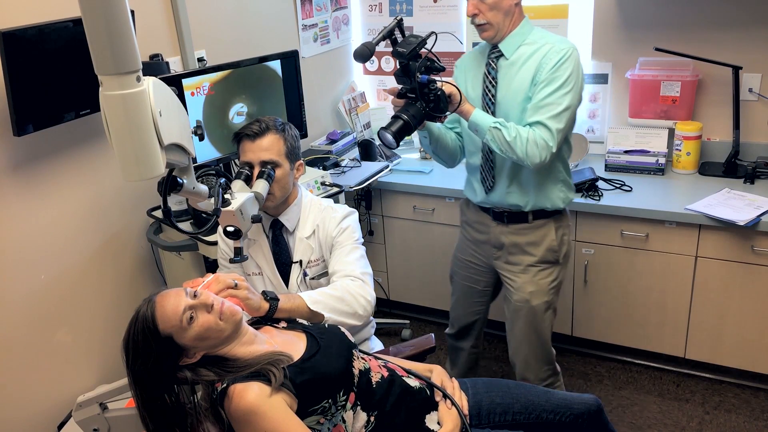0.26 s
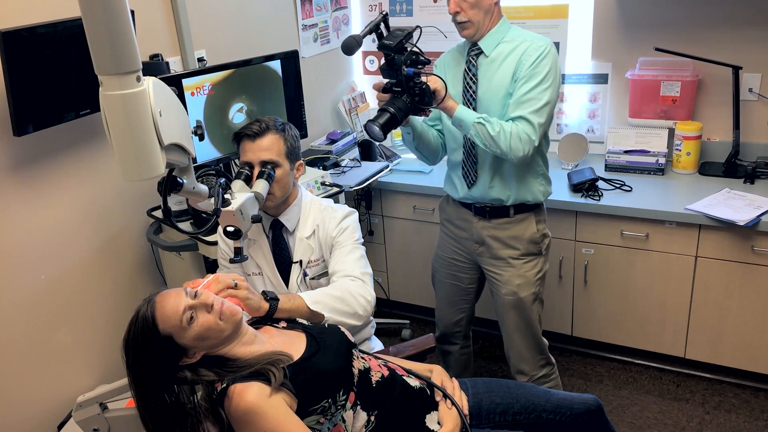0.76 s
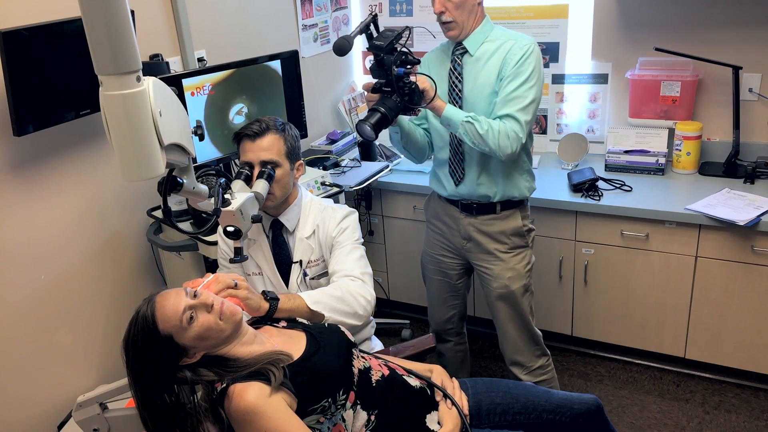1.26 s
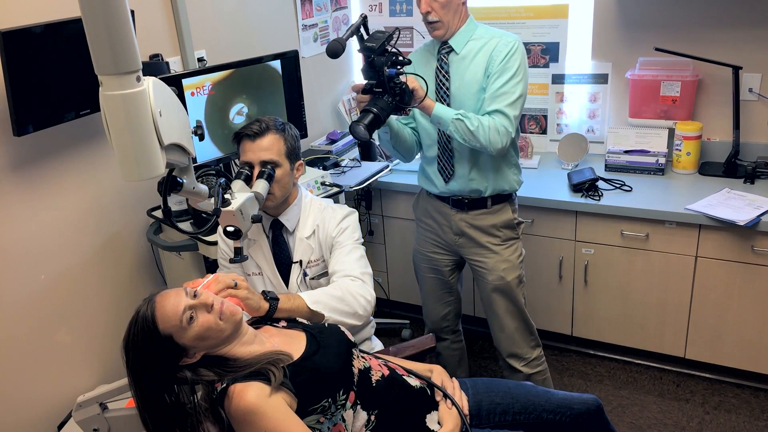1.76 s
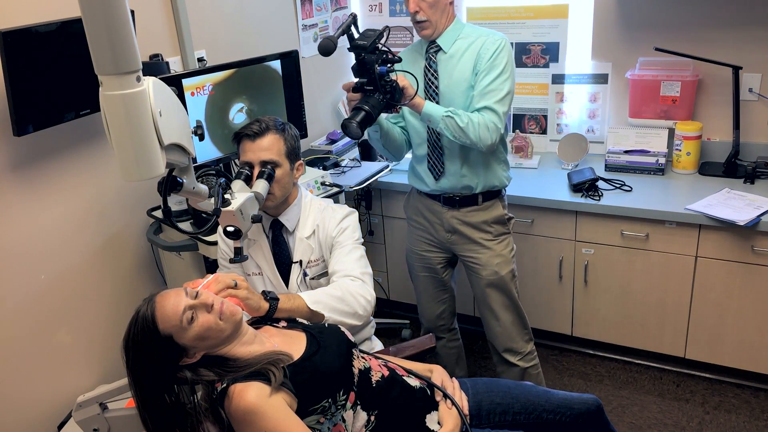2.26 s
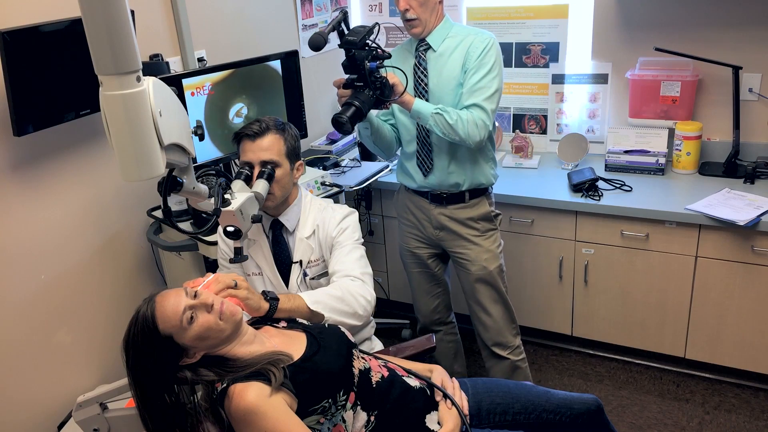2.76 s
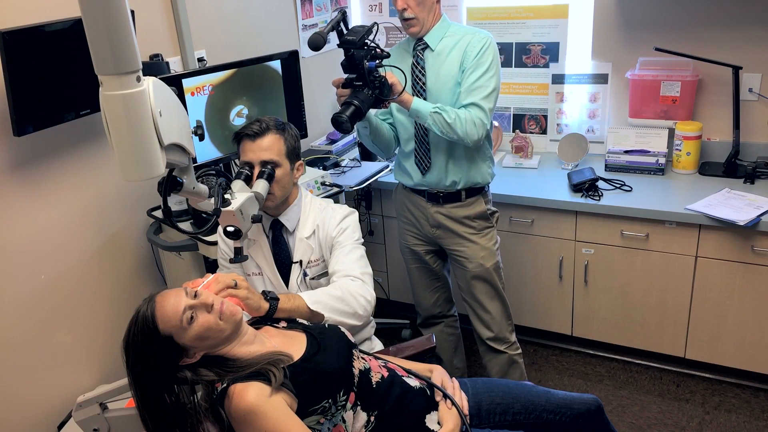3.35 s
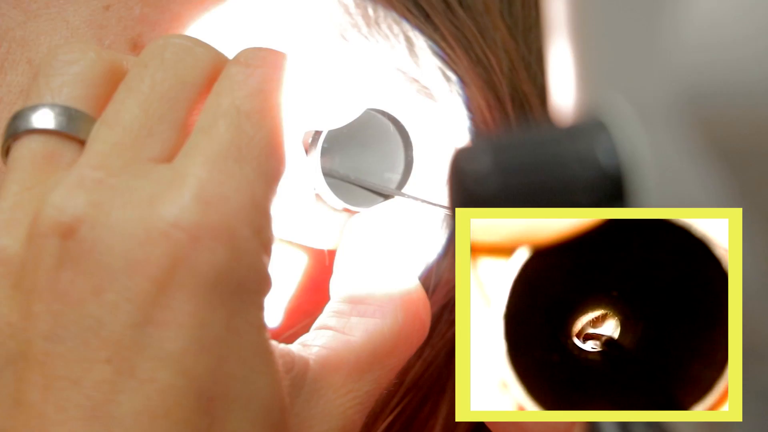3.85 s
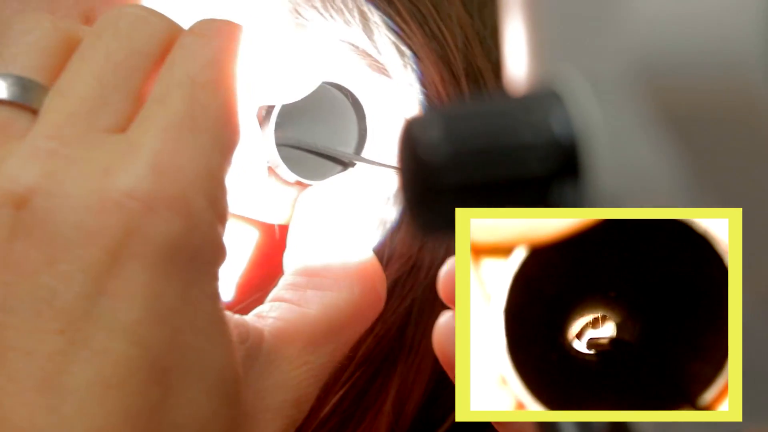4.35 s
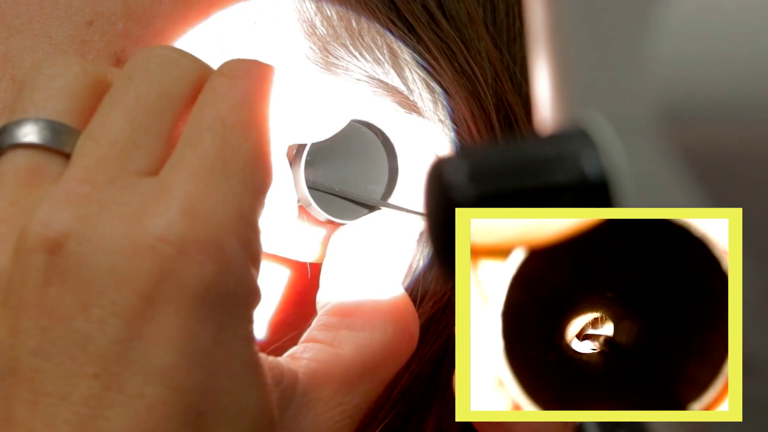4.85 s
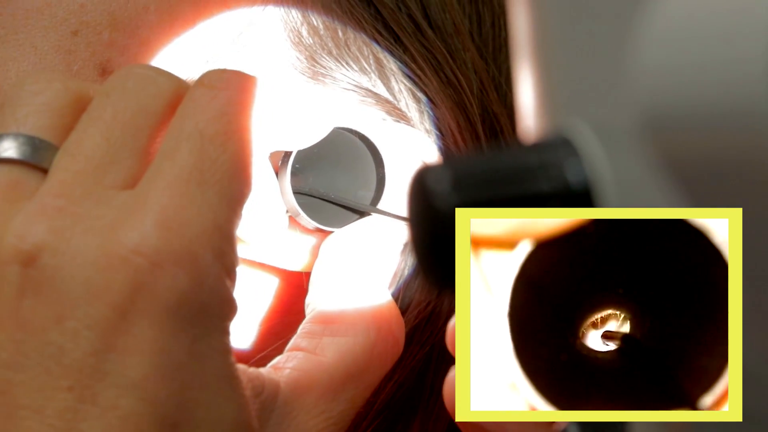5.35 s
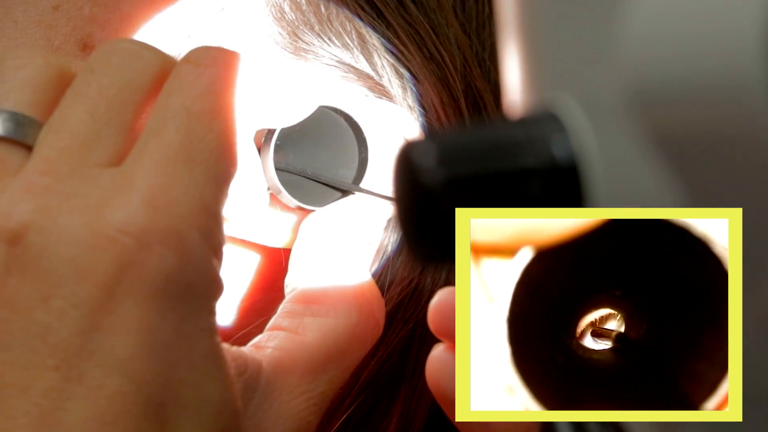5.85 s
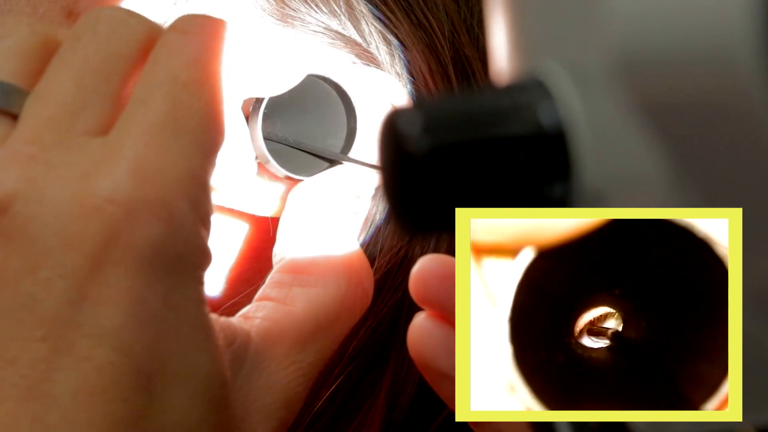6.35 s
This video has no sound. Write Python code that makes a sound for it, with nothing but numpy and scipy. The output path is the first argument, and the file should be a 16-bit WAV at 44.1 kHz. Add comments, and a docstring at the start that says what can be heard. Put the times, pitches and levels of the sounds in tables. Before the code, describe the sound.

In a small clinic room, a fine suction tip draws a bright, narrow hiss inside an ear, close to the microphone. Wax rattles up in a sharp crackling cluster early on; later the hiss chokes nearly silent, pops back wavering, then surges repeatedly. A hand nearby makes a hollow sweep in the treble. A pump hums low with fast pulsing throughout, and the hose knocks softly.

```python
"""A fine suction tip draws air inside an ear speculum: noise and tiny crackles, coloured by the narrow cavity.
Bits of wax rattle up the tube as short bursts; each bite makes the hiss surge and relax.
Once, wax blocks the tip and pops free, and sudden changes of vacuum jolt the hose with knocks and swings.
As the hand moves, a close reflection sweeps a hollow notch through the hiss.
Behind it a suction pump hums in a small clinic room, built from steady tones and pulsing air."""
import sys
import numpy as np
from scipy import signal
from scipy.fft import rfft, irfft
from scipy.io import wavfile
from scipy.ndimage import map_coordinates

SR = 44100
rng = np.random.default_rng(int(sys.argv[2]) if len(sys.argv) > 2 else 0)


def file_out(sig):
    """Save sig as 16-bit WAV at sys.argv[1]."""
    # one column per channel
    cols = np.atleast_2d(sig).T
    # limit, then scale
    lim = np.clip(cols, -1, 1)
    pcm = np.round(lim * 32767).astype(np.int16)
    wavfile.write(sys.argv[1], SR, pcm)


N = 291942
T = np.arange(N) / SR  # time of every sample, s
FREQS = np.arange(N // 2 + 1) * SR / N  # frequency of every spectrum bin, Hz

# steady draw of the open tip: (time [s], rush level [dB], sizzle level [dB], narrowness [0-1])
STEADY_DRAW = [(0, -35, -36.5, 0.15), (1.15, -35, -36.5, 0.87), (1.6, -35.5, -38, 0.37),
               (2.1, -35, -36, 0.66), (2.85, -34, -39, 0.23), (3.3, -35, -37, 0.3), (4.6, -36.5, -39, 0),
               (5.35, -36.5, -39.5, 0.14), (5.95, -33, -38.5, 0), (6.62, -36, -39.5, 0.14)]
# the tip bites into wax and the hiss surges: (time [s], rise [s], hold [s], release [s],
# rush gain [dB], sizzle gain [dB], added narrowness [0-1])
BITES = [(0.661, .03, 0.15, 0.15, 3, 5.5, .4), (1.274, 0.027, 0.1, 0.026, 3, 3.5, 0),
         (2.162, .015, 0.086, 0.014, 0.5, 8, 0.34), (2.44, 0.0062, 0.058, 0.21, 1.5, 9, 0.47),
         (3.55, 0.073, 0.038, 0.55, 4, 10, 0.37), (3.819, 0.076, 0.026, 0.06, 3.5, 7.5, 0),
         (4.888, 0.022, 0.026, 0.17, 7, 11.5, 0.1), (5.543, 0.012, 0.05, 0.23, 6, 13.5, 0.02),
         (6.077, 0.014, 0.0086, 0.016, -0.5, 4, .05)]
# distinct bits of wax passing the tip: (time [s], length [s], level [dB], rush relative to sizzle [dB])
WAX_BITS = [(.3585, 0.00072, -30, 10.5), (0.603, 0.0017, -37, 4), (.701, 0.0022, -10.5, -12),
            (.704, .0077, -10.5, -20), (0.714, 0.0056, -20.5, -1.5), (0.74, 0.0017, -16, -12),
            (0.774, .0005, -11, -16), (0.7885, 0.0078, -23.5, -1.5), (.848, 0.0024, -27, -17),
            (0.871, 0.0045, -13.5, -24), (0.882, 0.0032, -19, -15), (0.907, 0.0013, -15, -16),
            (.923, 0.00055, -16, -8), (0.935, 0.0017, -20, -18), (1.362, 0.0012, -19, -2),
            (2.1692, 0.0039, -19, -5), (2.411, .0047, -42, -28), (3.463, 0.00067, -28, 8.5),
            (3.493, 0.0037, -26, -1), (5.556, 0.0042, -9, -5.5), (5.562, .0033, -13.5, -5),
            (6.11, .001, -25, 5), (6.144, 0.00076, -24, 1)]
# broad colour of the jet in the speculum: (frequency [Hz], relative level [dB])
CAVITY_COLOUR = [(200, -29.5), (600, -20), (1050, -15.5), (1650, -7.5), (2200, -9), (2950, 1.5), (3600, -5),
                 (5300, -11), (6100, -8.5), (8400, -15), (10500, -4.5), (11400, -9.5), (13800, -37),
                 (16000, -51)]
# narrow resonances and hollows of the cavity: (frequency [Hz], width [Hz], boost or cut [dB])
CAVITY_RINGS = [(2023, 30, 7), (2227, 31, 9), (2386, 24, 10), (2590, 110, -3), (2617, 30, 7.5),
                (2720, 29, 2.5), (2777, 27, 4.5), (3670, 61, -7.5), (3950, 57, 3), (4570, 147, -11),
                (5465, 295, -8.5), (7480, 690, 6), (11800, 250, -11), (12000, 300, 1)]
# the hand reaches across the speculum and back:
# (nearest time [s], approach [s], retreat [s], lowest notch [Hz])
HAND_REACHES = [(4.319, 0.28, 0.27, 7300), (5.15, 0.2, 0.29, 7200)]
# pressure jolts in the hose: (time [s], swing level [dB], knock level [dB])
HOSE_JOLTS = [(0.699, -33, -23.5), (0.773, -48, -32), (.872, -35, -42), (2.169, -43, -52), (2.26, -54, -34),
              (2.463, -36, -49), (5.557, -28, -31)]
# tones of the piston strokes: (multiple of the shaft rate [-], level [dB])
PISTON_STROKES = [(1, -60), (2, -53), (3, -42), (4, -59), (5, -48), (6, -59), (7, -65.5), (8, -63.5),
                  (9, -58), (10, -67), (11, -51), (12, -52.5), (13, -53.5), (14, -50.5), (15, -61),
                  (18, -65), (19, -55.5), (20, -52.5), (21, -68), (24, -62.5), (25, -60.5), (26, -66),
                  (28, -68)]
# motor hum, rocked by the load of each turn:
# (multiple of the hum [-], sideband offset [shaft rates], level [dB])
MOTOR_HUM = [(1, -1, -62), (1, 0, -40), (1, 1, -39), (1, 2, -50), (1, 22, -63), (2, -1, -57), (2, 1, -55),
             (2, 2, -63)]
# colour of the pump housing and room air: (frequency [Hz], relative level [dB])
RUMBLE_COLOUR = [(15, -12), (32, -11), (45, 4), (65, 6.5), (110, 3), (180, 2.5), (270, 3), (400, 1),
                 (480, -5.5), (760, -5.5), (1100, -5.5), (1500, -9.5), (2500, -20), (8000, -17),
                 (16000, -30)]
# hollow in the microphone's response: (frequency [Hz], width [Hz], boost or cut [dB])
MIC_HOLLOW = [(1266, 74, -22.5), (1390, 437, -13)]

SPLIT_HZ = 4700  # the rush lies below, the sizzle above
SIZZLE_FADE = 2.15  # the sizzle dies this many times faster than the rush
DRIFT_DB, DRIFT_HZ = -0.04, 18  # a barely perceptible random drift of the draw
# a plug seals the tip but for a small leak; once it is free the flow swings to rest
PLUG_S, FREE_S, SEAL_S, OPEN_S = 2.27, 2.462, 0.0064, 0.0088
LEAK_RUSH_DB, LEAK_SIZZLE_DB = -47, -27
SWING_HZ, SWING_DB, SWING_S, SWING_LAG_S = 14.7, 2.5, 0.42, 0.018
REST_NOTCH_HZ = 14500
# while the hand stays close its reflection is strong (echo shares 0-1)
CLOSE_S, AWAY_S, HAND_MOVE_S, CLOSE_ECHO, AWAY_ECHO = 3.88, 5.52, 0.12, 0.82, 0.091
SHAFT_HZ, HUM_HZ = 29.19, 119.9
TOP_HZ = 15750  # the recorded sound is cut above this


def suction(thin_tilt_db=7):
    """Jet and wax sound through the cavity: a low rush, and a sizzle that brightens in a narrow opening."""
    cavity = contour(CAVITY_COLOUR) + peaks(CAVITY_RINGS)
    below = 1 / (1 + (FREQS / SPLIT_HZ) ** 8)
    low = cavity + 10 * np.log10(below + 1e-6)
    high = cavity + 10 * np.log10(1 - below + 1e-6)
    bright = high + thin_tilt_db * (FREQS / SPLIT_HZ)

    rush_level, sizzle_level, thin = flow()
    air = jet() * crumbs(thin)
    wax_rush, wax_sizzle = wax_bursts()
    rush = air * undb(rush_level) + wax_rush
    sizzle = air * undb(sizzle_level) + wax_sizzle
    # the narrower the opening, the more sizzle takes the bright colour
    return colour(rush, low) + colour((1 - thin) * sizzle, high) + colour(thin * sizzle, bright)


def jet(flutter_db=1.06, sputter_db=2.0, crackle_db=-7, crackle_rate=500, spread_db=5.0):
    """Turbulence at the tip: sputtering noise and tiny bursts of moist film."""
    # a slow flutter and a fast sputter move the noise level
    wobble_db = flutter_db * walk(16.6) + sputter_db * walk(280)
    air = rng.standard_normal(N) * undb(wobble_db)
    bursts = rng.random(N) < crackle_rate / SR  # bursts per second
    sizes = undb(spread_db * np.minimum(rng.exponential(size=N), 4))
    crackle = bursts * sizes * rng.choice([-1, 1], N)
    return unit(unit(air) + undb(crackle_db) * unit(crackle))


def flow():
    """Air flow sets rush dB, sizzle dB and narrowness: a nearly even draw, surges and one blockage."""
    rush, sizzle, thin = curves(STEADY_DRAW)
    for s, rise, hold, release, rush_db, sizzle_db, narrowing in BITES:
        grip = np.clip((T - s) / rise, 0, 1)
        grip = grip * np.exp(-np.maximum(T - s - rise - hold, 0) / release)
        bite = grip ** SIZZLE_FADE
        rush = rush + rush_db * grip
        sizzle = sizzle + sizzle_db * bite
        thin = thin + narrowing * bite

    sealed = gate(PLUG_S, SEAL_S, FREE_S - OPEN_S, OPEN_S)
    age = np.maximum(T - FREE_S, 0)
    swing = SWING_DB * np.exp(-age / SWING_S) * np.cos(2 * np.pi * SWING_HZ * (age - SWING_LAG_S))
    change = DRIFT_DB * walk(DRIFT_HZ) + (T > FREE_S) * swing
    rush = rush + change + LEAK_RUSH_DB * sealed
    sizzle = sizzle + change + LEAK_SIZZLE_DB * sealed
    return rush, sizzle, np.clip(thin, 0, 1)


def crumbs(thin, open_rate=12, narrow_rate=60, scatter_db=2, fade_s=0.0018):
    """Small crumbs flick through at random and lift the jet briefly, more often in a narrow opening."""
    rate = open_rate + narrow_rate * thin ** 2  # crumbs per second
    passing = rng.random(N) < rate / SR
    sizes = undb(scatter_db * (2 * rng.random(N) - 1))
    # each crumb's lift dies away exponentially
    return 1 + signal.lfilter([1], [1, -np.exp(-1 / (fade_s * SR))], passing * sizes)


def wax_bursts(fade_s=0.00071, low_hz=2650):
    """Each bit of wax tears through the tip as a short, thin burst; returns its rush and its sizzle."""
    rush, sizzle = np.zeros(N), np.zeros(N)
    for s, length, db, rush_db in WAX_BITS:
        burst = (T >= s) * np.exp(-np.clip((T - s - length) / fade_s, 0, 20))
        rush += undb(db + rush_db) * burst
        sizzle += undb(db) * burst
    thin_filter = signal.butter(6, low_hz, "high", fs=SR, output="sos")
    tear = signal.sosfilt(thin_filter, rng.standard_normal(N))
    return rush * tear, sizzle * tear


def past_hand(x):
    """A slightly longer path cancels the pitch it delays by half a cycle; each reach lowers that notch."""
    pulls = []
    for s, approach, retreat, lowest_hz in HAND_REACHES:
        pace = np.where(T < s, approach, retreat)
        pulls.append((REST_NOTCH_HZ - lowest_hz) * np.exp(-((T - s) / pace) ** 2))
    notch_hz = REST_NOTCH_HZ - np.max(pulls, axis=0)
    close = gate(CLOSE_S, HAND_MOVE_S, AWAY_S, HAND_MOVE_S)
    strength = np.clip(AWAY_ECHO + (CLOSE_ECHO - AWAY_ECHO) * close, 0, 1)
    # read the sound half a notch cycle late, between samples where needed
    late = map_coordinates(x, [np.arange(N) - SR / (2 * notch_hz)], order=5)
    return (x + strength * late) / (1 + strength)


def room(x, t60=0.27, wet_db=-10, damp_hz=5000):
    """Walls and cabinets close by: a short, dense tail, duller than the direct sound."""
    t = T[:SR // 2]
    fade = np.exp(-np.log(1000) * t / t60)  # down 60 dB after t60 seconds
    tail = rng.standard_normal(len(t)) * fade * (t > .003)
    damping = signal.butter(1, damp_hz, fs=SR, output="sos")
    tail = signal.sosfilt(damping, tail / np.linalg.norm(tail))
    return x + undb(wet_db) * signal.fftconvolve(x, tail)[:N]


def hose(swing_hz=48, decay_s=.02, knock_hz=1100, knock_s=0.0055):
    """A sudden change of vacuum jolts the hose: a dull knock and a low swing."""
    out = np.zeros(N)
    dull = signal.butter(3, knock_hz, fs=SR, output="sos")
    knock = unit(signal.sosfilt(dull, rng.standard_normal(N)))
    for s, swing_db, knock_db in HOSE_JOLTS:
        age = np.maximum(T - s, 0)
        swing = np.sin(2 * np.pi * swing_hz * age) * np.exp(-age / decay_s)
        thud = knock * np.exp(-age / knock_s)
        out += (T >= s) * (undb(swing_db) * swing + undb(knock_db) * thud)
    return out


def pump(waver_db=0.32, slip=0.0065, rumble_db=-45.5, chuff=0.89, chuff_hz=1500):
    """Piston strokes beat against the motor hum; the valves chuff once a turn."""
    turn = 2 * np.pi * SHAFT_HZ * T + slip * walk(1)  # shaft angle, its slip in radians
    hum = 2 * np.pi * HUM_HZ * T
    lines = [(k * turn, db) for k, db in PISTON_STROKES]
    lines += [(k * hum + side * turn, db) for k, side, db in MOTOR_HUM]
    tones = np.zeros(N)
    for phase, db in lines:
        # housing and room give every line a phase of its own
        start = rng.uniform(0, 2 * np.pi)
        tones += np.sqrt(2) * undb(db) * np.sin(phase + start)

    valves = unit(rng.standard_normal(N) * np.exp(chuff * np.cos(turn)))
    # only the low end pulses; the room air above it is even
    pulsing = 1 / (1 + (FREQS / chuff_hz) ** 4)
    even = rfft(rng.standard_normal(N)) * np.sqrt(1 - pulsing)
    air = irfft(rfft(valves) * np.sqrt(pulsing) + even, N)
    rumble = undb(rumble_db) * colour(air, contour(RUMBLE_COLOUR))
    return tones * undb(waver_db * walk(4.8)) + rumble


def undb(db):
    """Decibels to gain."""
    return 10 ** (np.asarray(db) / 20)


def unit(x):
    """Scale to a typical size (standard deviation) of 1."""
    return x / np.std(x)


def curves(table):
    """The columns of a time table, joined by straight lines."""
    s, *columns = np.transpose(table)
    return [np.interp(T, s, c) for c in columns]


def walk(rate):
    """Smooth random drift of spread 1, with little movement faster than `rate` in Hz."""
    return unit(irfft(rfft(rng.standard_normal(N)) / (1 + (FREQS / rate) ** 4), N))


def gate(on_s, rise_s, off_s, fall_s):
    """0 to 1 and back, with straight ramps that start at the two times."""
    return np.clip((T - on_s) / rise_s, 0, 1) - np.clip((T - off_s) / fall_s, 0, 1)


def contour(points):
    """dB at every frequency, joined between (Hz, dB) points on a log frequency scale."""
    hz, db = np.transpose(points)
    return np.interp(np.log(FREQS + 1), np.log(hz), db)


def peaks(table):
    """dB at every frequency from (Hz, width, dB) bumps and hollows."""
    return sum(db / (1 + (2 * (FREQS - hz) / width) ** 2) for hz, width, db in table)


def colour(x, db):
    """Filter to the shape of a dB curve, without sound ahead of its cause; white noise keeps its level."""
    gain = undb(db) / np.sqrt(np.mean(undb(db) ** 2))
    # fold the cepstrum (spectrum of the log gain) forward in time to get minimum phase
    cepstrum = irfft(np.log(gain), N)
    cepstrum[1:N // 2] *= 2
    cepstrum[N // 2 + 1:] = 0
    return irfft(rfft(x) * np.exp(rfft(cepstrum)), N)


def scene():
    """The hiss close by, the pump and its hose behind it."""
    hiss = past_hand(room(suction()))
    return (hiss + hose() + pump())[None]


def record(dry, ceiling=1.0):
    """The microphone has a deep hollow; the loudest pops are rounded off and the top is cut."""
    heard = ceiling * np.tanh(colour(dry, peaks(MIC_HOLLOW)) / ceiling)
    top_cut = signal.ellip(10, .1, 80, TOP_HZ, fs=SR, output="sos")
    return signal.sosfilt(top_cut, heard)


dry = scene()
out = record(dry)
file_out(out)
```